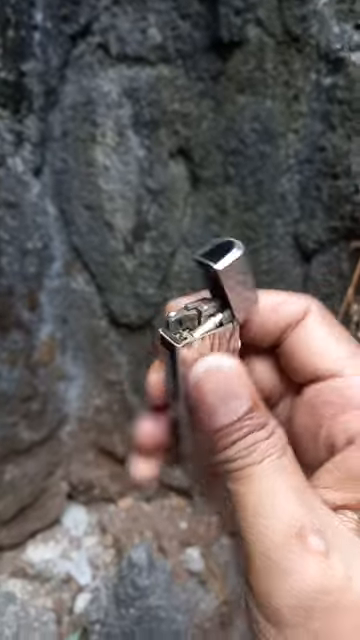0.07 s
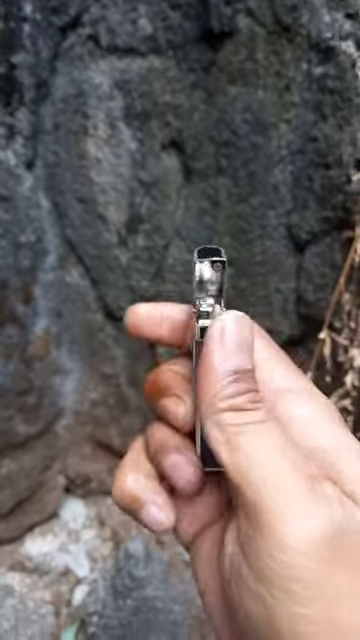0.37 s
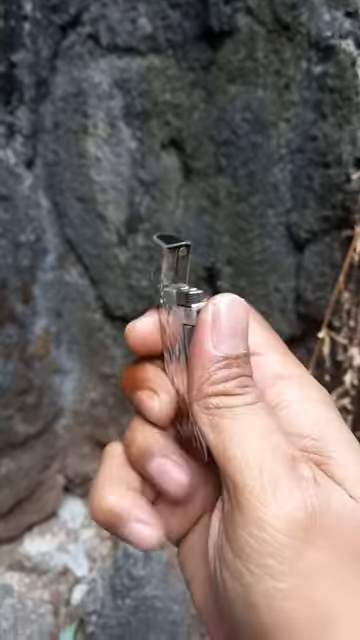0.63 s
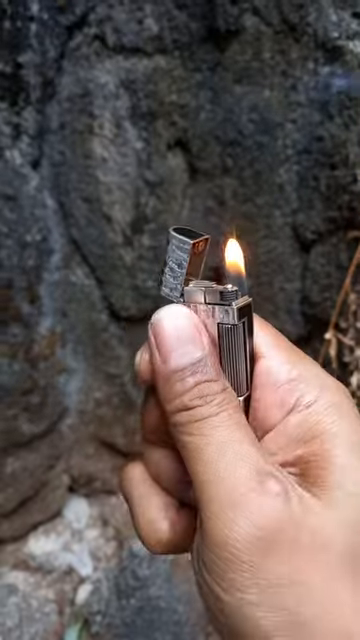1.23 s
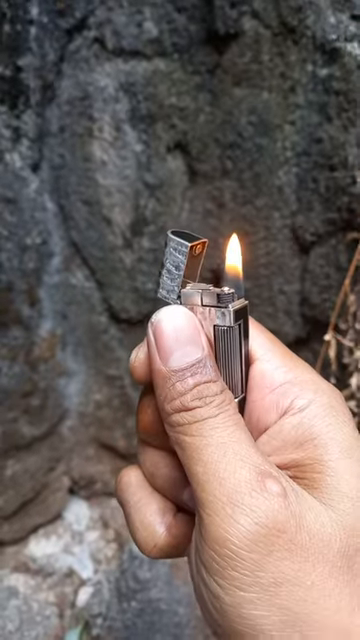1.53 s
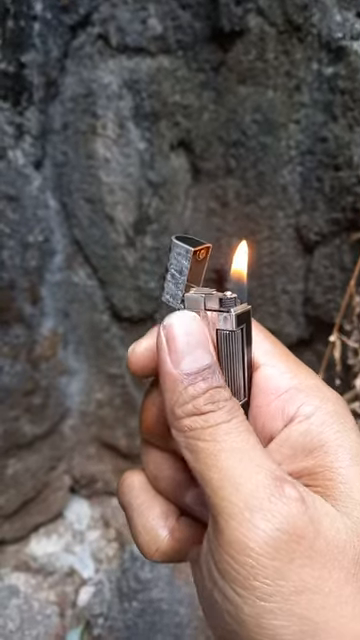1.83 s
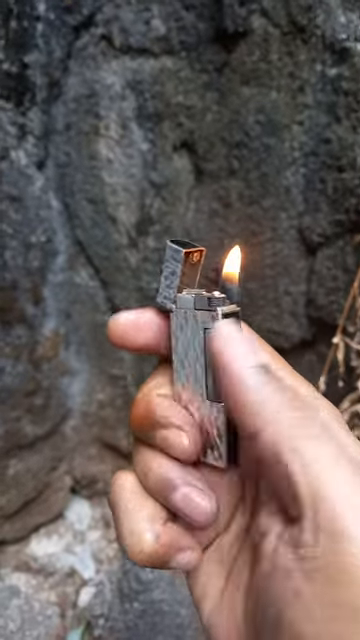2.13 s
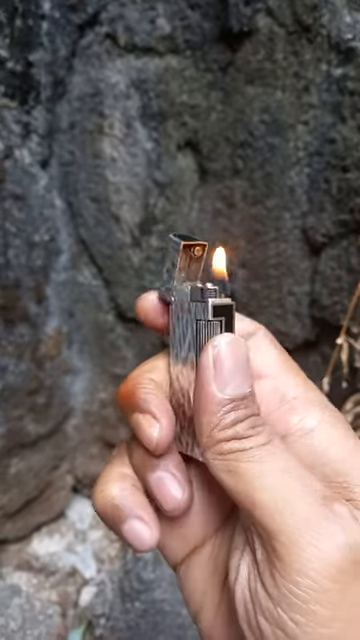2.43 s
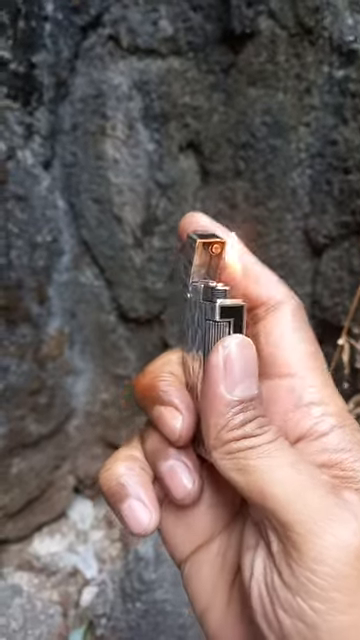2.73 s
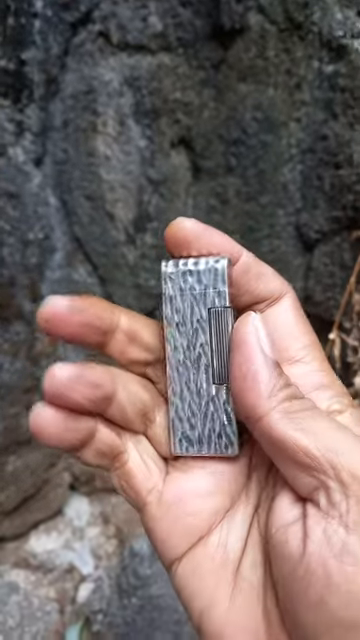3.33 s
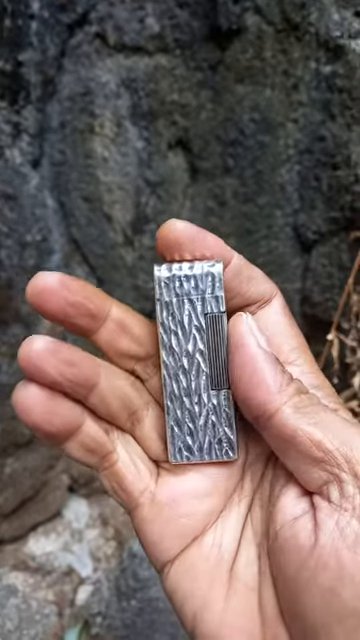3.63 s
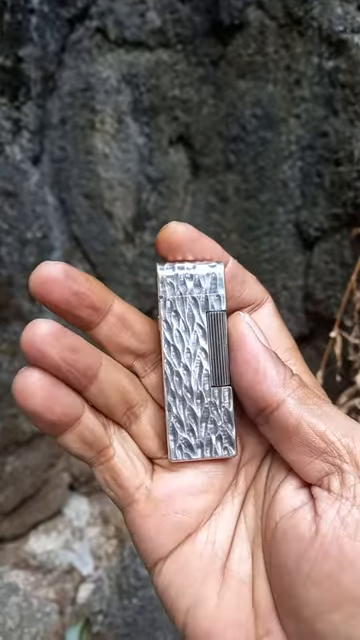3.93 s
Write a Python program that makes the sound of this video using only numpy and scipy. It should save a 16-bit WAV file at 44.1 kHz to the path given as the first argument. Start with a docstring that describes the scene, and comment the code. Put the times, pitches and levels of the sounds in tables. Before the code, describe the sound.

Close up, a lighter's flint wheel scrapes once and the gas burns almost silently until the metal lid clacks shut about two seconds later. Far-off traffic hums outdoors, and a bird whistles two short, quiet phrases.

```python
"""A lighter struck outdoors

Close to the microphone, before a stone wall, a metal lighter's wheel rasps on its flint by friction.
The gas burns with a faint hiss; then the lid's impact rings the case and squeezes out a puff of air.
Small engines drone in harmonics on a road some way off, and a bird whistles two short phrases."""
import sys
import numpy as np
from scipy import signal
from scipy.fft import rfft, irfft
from scipy.io import wavfile

SR = 44100
rng = np.random.default_rng(int(sys.argv[2]) if len(sys.argv) > 2 else 0)


def wav_out(sig):
    """Save sig, one row per channel (or a flat mono array), as 16-bit PCM at SR to the path in sys.argv[1]."""
    wavfile.write(sys.argv[1], SR, np.round(np.clip(np.atleast_2d(sig).T, -1, 1) * 32767).astype(np.int16))


N = 176400
T = np.arange(N) / SR

# The wheel's push on the flint: time_s, level_db
WHEEL_PUSH = [(1.047, -50), (1.056, -35), (1.0595, -24), (1.063, -25), (1.067, -26.5), (1.071, -36),
              (1.080, -41), (1.088, -56)]
# The wheel catches and hits its stop: time_s, level_db
WHEEL_CATCHES = [(1.0588, -8), (1.0627, -9), (1.0690, -5)]
# Spectrum of the rasp: frequency_hz, gain_db
FLINT_COLOUR = [(300, -5), (900, -8), (1300, -11.5), (2300, 0), (3100, -1.5), (4600, -3.5), (7200, -17.5),
                (9000, -1.5), (12000, -8.5), (15500, -12)]
# Its balance: frequency_hz, left_minus_right_db
FLINT_PAN = [(500, -8), (1650, 3), (4500, -6), (15000, 14)]
HANDLING_ECHO_DB = -15.5


def strike(teeth_per_s=3500, thumb_s=1.2):
    """Friction as a train of impulses: teeth tear at the flint, catch and stop; the thumb thuds."""
    push_db, = in_time(WHEEL_PUSH)
    teeth = (rng.random(N) < teeth_per_s / SR) * rng.choice([-1, 1], N)
    teeth = teeth * from_db(rng.uniform(-5.4, 6, N))
    turning = (T > WHEEL_PUSH[0][0]) * (T < WHEEL_PUSH[-1][0])
    force = rms_one(teeth) * from_db(push_db) * turning
    force += sum(from_db(db) * click(s) for s, db in WHEEL_CATCHES)
    rasp = radiate(force, FLINT_COLOUR, FLINT_PAN) + from_db(-29) * case(force)
    thud = from_db(-29) * ring(-click(thumb_s), hz=107, t60_s=0.075)
    return close_by(rasp, HANDLING_ECHO_DB) + thud


# The lid lands and latches: time_s, level_db, left_minus_right_db
LID_HITS = [(2.9520, 9, -1.5), (2.9551, -1.5, 11)]
# Spectrum of the snap: frequency_hz, gain_db
SNAP_COLOUR = [(150, -0.5), (700, -6.5), (1400, -6.5), (2400, -1), (3300, 3.5), (4500, 1.5), (5500, -13),
               (6900, -12), (8200, 0), (11300, 4), (15500, -6.5)]
# Its balance: frequency_hz, left_minus_right_db
SNAP_PAN = [(300, 21.5), (1300, 8), (2400, -7.5), (4400, -8), (8100, -3.5), (15000, 16)]
# The case's crowded modes, merged into a metallic wash: frequency_hz, gain_db
WASH_COLOUR = [(900, -16.5), (2400, 0), (3600, -10), (4600, 4.5), (6700, -6), (8200, -1.5), (11700, 0),
               (15500, -11)]
# Its balance: frequency_hz, left_minus_right_db
WASH_PAN = [(2000, -5.5), (5000, 0.5), (12000, -12)]


def lid(contact_s=0.00046, chatter_s=0.0024, wash_s=0.022):
    """Impact excitation: metal meets metal in a broadband crack and chatter that ring the case."""
    crack = 0
    for s, db, pan_db in LID_HITS:
        contact = click(s) + .5 * burst(s, contact_s)
        chatter = from_db(-7) * burst(s, chatter_s)
        crack += from_db(db) * pan(pan_db) * (contact + chatter)
    landing_s, landing_db, _ = LID_HITS[0]
    crowded_modes = np.array([burst(landing_s, wash_s), burst(landing_s, wash_s)])
    wash = from_db(1) * radiate(crowded_modes, WASH_COLOUR, WASH_PAN)
    snap = radiate(crack, SNAP_COLOUR, SNAP_PAN)
    return close_by(snap + wash, echo_db=-13.5) + case(from_db(landing_db) * click(landing_s))


# The case's clearest modes: frequency_hz, relative_db, t60_s
CASE_MODES = [(2252, -2, .14), (2500, 13, .03), (3380, 17, .024), (4261, -3, .13), (4608, -4, .15),
              (10487, -3, .17), (11680, -1, .14), (13757, -1, .18)]


def case(force):
    """Modal superposition: the metal case answers a force with a sum of damped sines."""
    return from_db(-51) * sum(from_db(db) * ring(force, hz, t60_s) * rng.choice([-1, 1], (2, 1))
                              for hz, db, t60_s in CASE_MODES)


def puff(start_s=2.9525, start_hz=103, end_hz=45, sag_s=0.017, rise_s=0.0014, decay_s=0.0097):
    """Air displacement: the lid's puff hits the left microphone port in a low swing of falling pitch."""
    t = np.maximum(T - start_s, 0)
    cycles = end_hz * t + (start_hz - end_hz) * sag_s * (1 - np.exp(-t / sag_s))
    envelope = (1 - np.exp(-t / rise_s)) * np.exp(-t / decay_s)
    return from_db(-18) * pan(33) * envelope / envelope.max() * np.sin(2 * np.pi * cycles)


# Hiss of the gas flow: time_s, level_db
GAS_FLOW = [(1.06, -72), (1.3, -66.5), (1.58, -61.5), (2.03, -67.5), (2.14, -80), (2.9, -105)]
# Spectrum of the hiss: frequency_hz, gain_db
GAS_COLOUR = [(4000, -13.5), (7200, -2.5), (8800, -2.5), (9800, 3), (12500, -15.5), (16000, -40)]


def flame():
    """Jet noise: escaping gas hisses and dies away."""
    gas_db, = in_time(GAS_FLOW)
    return from_db(gas_db) * (T > GAS_FLOW[0][0]) * noise(GAS_COLOUR)


# Finger strokes on the case: start_s, length_s, level_db
RUBS = [(0.24, 0.59, -78), (.83, 0.34, -75), (2.18, 0.071, -75.5), (2.31, 0.13, -74.5),
        (3.467, 0.18, -77.5), (3.722, 0.3, -79)]
# Spectrum of skin on metal: frequency_hz, gain_db
SKIN_COLOUR = [(7000, -13.5), (8200, 4), (9700, 2), (10500, -5.5), (15000, -23)]


def fingers(grain_db=3, ticks_per_s=9):
    """Sliding friction: fingertips cross the ribbed case in grainy strokes, with faint, sparse ticks."""
    strokes = sum(from_db(db) * swell(s, length_s) for s, length_s, db in RUBS)
    rub = strokes * from_db(grain_db * drift(43)) * noise(SKIN_COLOUR)
    ticks = (rng.random(N) < ticks_per_s / SR) * from_db(-53.5 + rng.uniform(-5.4, 6, N))
    return rub + close_by(radiate(ticks, SKIN_COLOUR, OUTDOOR_PAN), HANDLING_ECHO_DB)


# Three passing engines: time_s, firing_hz, level_db
NEAR_ENGINE = [(0, 45.5, -53.5), (1.05, 53.6, -46), (1.3, 49.5, -37.5), (1.62, 48, -39), (2.02, 45.6, -36),
               (2.11, 43.2, -47), (2.9, 41, -53), (3.2, 41.6, -57)]
FAR_ENGINE = [(0, 37.37, -49), (.8, 37.76, -48), (1.7, 37.13, -43), (2.7, 36.65, -45.5),
              (3.3, 37.33, -68.5)]
LATE_ENGINE = [(0, 40, -77.5), (3.2, 39.62, -54), (3.75, 39.48, -47), (4, 39.52, -48)]
# Their harmonics, from the firing rate upward: relative_db
NEAR_HARMONICS = [0.5, 5, -5, -20.5, -9, -5, -3, -8, -23.5, -8.5, -17.5, -24.5, -22, -13.5]
FAR_HARMONICS = [-21, 0, -6, -2, -13, -3.5, -12.5]
LATE_HARMONICS = [-19, -7.5, 4, 4, -10, -4.5, -4.5, -17]


def engines(jitter_share=0.00575, flutter_db=3):
    """Periodic firing: each slightly uneven engine gives a harmonic series that flutters on its way."""
    drone = np.zeros(N)
    for course, harmonics in ((NEAR_ENGINE, NEAR_HARMONICS), (FAR_ENGINE, FAR_HARMONICS),
                              (LATE_ENGINE, LATE_HARMONICS)):
        firing_hz, level_db = in_time(course)
        phase = 2 * np.pi * np.cumsum(firing_hz * (1 + jitter_share * drift(8))) / SR
        tones = np.zeros(N)
        for order, db in enumerate(harmonics, 1):
            gain = from_db(db + flutter_db * drift(6.1))
            smear_rad = rng.standard_normal()  # echoes blur each firing
            tones += gain * np.cos(order * phase + smear_rad)
        drone += from_db(level_db) * rms_one(tones)
    return drone


# Bass spectrum of a passing engine: frequency_hz, gain_db
ENGINE_BASS = [(28, -35), (42, 1), (90, -1), (140, -23.5), (1000, -66)]


def engine_swell():
    """Band-limited noise: the bass of a passing engine swells briefly."""
    return from_db(-44) * swell(start_s=1.7, length_s=0.4) * noise(ENGINE_BASS)


# Tyre noise: time_s, level_db
TYRES = [(0, -54.5), (.5, -49.5), (1.0, -46.5), (1.55, -40.5), (1.9, -45.5), (2.25, -54), (2.6, -57),
         (3.1, -52.5), (3.7, -51), (4, -51)]
# Its spectrum: frequency_hz, gain_db
TYRE_COLOUR = [(150, -19), (330, 2), (650, 0.5), (830, -3.5), (980, -1.5), (1400, -9), (2150, -9.5),
               (2600, -16.5), (3300, -19.5), (4500, -33.5), (5900, -43.5), (16000, -53)]
# Treble that grows as traffic nears: frequency_hz, gain_db
NEAR_COLOUR = [(1500, -24.5), (2600, -4.5), (4200, -4), (5900, -14.5), (16000, -30)]
# Road rumble: time_s, level_db
RUMBLE = [(0, -47.5), (1.0, -47), (1.7, -42.5), (2.35, -47), (2.9, -46), (3.3, -51), (3.75, -47)]
# Its spectrum: frequency_hz, gain_db
RUMBLE_COLOUR = [(28, -33), (45, -2.5), (80, 1.5), (135, 2), (200, -4.5), (290, -3.5), (430, -7),
                 (600, -24.5), (1500, -55)]


def traffic(treble_db_per_db=1.66):
    """Rolling noise: tyres grow louder and brighter as they near, under the engines and the rumble."""
    tyre_db, = in_time(TYRES)
    rumble_db, = in_time(RUMBLE)
    treble_db = -56 + treble_db_per_db * (tyre_db - tyre_db.max())
    tyres = from_db(tyre_db) * noise(TYRE_COLOUR) + from_db(treble_db) * noise(NEAR_COLOUR)
    return tyres + engines() + engine_swell() + from_db(rumble_db) * noise(RUMBLE_COLOUR)


# Whistled notes: start_s, length_s, start_hz, end_hz, level_db
BIRD_NOTES = [(0, 0.031, 3355, 2890, -50), (0.047, 0.015, 3143, 2980, -51.5),
              (0.061, 0.019, 2960, 2610, -47.5), (.096, 0.016, 2830, 2354, -51),
              (.22, 0.024, 3600, 3120, -55), (0.285, 0.037, 2600, 3100, -54.5),
              (0.315, 0.0287, 3470, 3010, -53), (0.37, 0.035, 3350, 3370, -60.5),
              (2.518, 0.06, 2880, 2950, -65), (2.616, 0.017, 2850, 2520, -59),
              (2.724, 0.032, 3516, 3270, -68.5), (2.791, 0.05, 2500, 3150, -60),
              (2.817, 0.029, 3420, 3380, -58), (3.063, 0.093, 3200, 2940, -55),
              (3.166, 0.014, 2850, 2554, -49), (3.28, 0.03, 3683, 3580, -59.5),
              (3.338, 0.034, 2620, 2865, -60.5), (3.37, 0.05, 3300, 3380, -64)]


def bird(warble_share=.03, flutter_db=3):
    """Frequency modulation: short whistles glide and warble, blurred by reverberation from afar."""
    song = np.zeros(N)
    warble = 1 + warble_share * drift(120)
    for start_s, length_s, start_hz, end_hz, db in BIRD_NOTES:
        sounding = (T >= start_s) & (T < start_s + length_s)
        progress = (T[sounding] - start_s) / length_s
        pitch_hz = (start_hz + (end_hz - start_hz) * progress) * warble[sounding]
        envelope = from_db(db) * np.sqrt(2 * np.abs(np.sin(np.pi * progress)))
        song[sounding] += envelope * np.sin(2 * np.pi * np.cumsum(pitch_hz) / SR)
    song *= from_db(flutter_db * (drift(90) - .5))
    return pan(-5.5) * (from_db(-0.5) * song + from_db(1) * echoes(song, t60_s=0.54))


# Spectrum of the background hiss: frequency_hz, gain_db
AIR_COLOUR = [(3000, -1.5), (7000, -5), (8300, 4.5), (13000, -8.5)]


def air():
    """Noise floor: a faint, steady, high hiss."""
    return from_db(-78) * noise(AIR_COLOUR)


def close_by(x, echo_db, lag_s=.00015, t60_s=0.38):
    """Path difference: sound reaches the left port first; the walls answer evenly on both sides."""
    direct = np.array([x[0], np.roll(x[1], int(lag_s * SR))])
    return direct + from_db(echo_db) * (echoes(x[0], t60_s) + echoes(x[1], t60_s)) / np.sqrt(2)


def echoes(x, t60_s, early_t60_s=0.17, treble_hz=9000, treble_t60_share=.66):
    """Reverberation from stone: dense early reflections and a longer tail whose treble dies first."""
    t = T[:SR // 2]
    white = rng.standard_normal((2, len(t)))
    dull = signal.sosfiltfilt(signal.butter(2, treble_hz, fs=SR, output="sos"), white)
    fade = lambda seconds: from_db(-60 * t / seconds)
    tail = dull * fade(t60_s) + (white - dull) * fade(t60_s * treble_t60_share)
    early = white * from_db(-5.5) * fade(early_t60_s)
    response = rms_one(tail + early) / np.sqrt(len(t))
    return signal.fftconvolve(np.broadcast_to(x, (2, N)), response, axes=1)[:, :N]


# Likeness of left and right outdoors: frequency_hz, correlation
COHERENCE = [(60, 0.54), (250, 0.93), (500, 0.37), (1000, 0.062)]
# Balance outdoors: frequency_hz, left_minus_right_db
OUTDOOR_PAN = [(60, -3.5), (300, -6), (640, -0.5), (1500, -6), (3100, -5), (7000, -3.5), (14000, 4)]


def noise(spectrum):
    """Partial coherence: coloured stereo noise of unit power, alike in the bass and leaning right."""
    hz = np.fft.rfftfreq(N, 1 / SR)
    mid, side = rfft(rng.standard_normal((2, N))) * from_db(at_hz(spectrum, hz))
    alike = np.clip(at_hz(COHERENCE, hz), -1, 1)
    signs = np.array([[1], [-1]])
    stereo = np.sqrt(1 + alike) * mid + np.sqrt(1 - alike) * side * signs
    return rms_one(irfft(stereo * from_db(signs * at_hz(OUTDOOR_PAN, hz) / 2), N))


def radiate(x, spectrum, balance, size=2048):
    """Minimum-phase filtering: causal stereo colouring that keeps a click's energy."""
    hz = np.fft.rfftfreq(size, 1 / SR)
    gain_db = at_hz(spectrum, hz) + at_hz(balance, hz) * np.array([[.5], [-.5]])
    cepstrum = irfft(np.log(from_db(gain_db)))
    cepstrum[:, 1:size // 2] *= 2
    cepstrum[:, size // 2 + 1:] = 0
    response = rms_one(irfft(np.exp(rfft(cepstrum)))) / np.sqrt(size)
    return signal.fftconvolve(np.broadcast_to(x, (2, N)), response, axes=1)[:, :N]


def ring(x, hz, t60_s):
    """Damped resonance: a unit click starts a dying sine of height 1."""
    radius, angle = from_db(-60 / (t60_s * SR)), 2 * np.pi * hz / SR
    return signal.lfilter([0, np.sin(angle)], [1, -2 * radius * np.cos(angle), radius ** 2], x + 1e-18)


def click(time_s):
    """A unit impulse."""
    return 1. * (np.arange(N) == int(time_s * SR))


def burst(start_s, decay_s):
    """Exponential decay: a dying run of tiny contacts with unit energy."""
    contacts = rng.choice([-1, 1], N) * (T > start_s)
    return rms_one(contacts * np.exp(-np.abs(T - start_s) / decay_s)) / np.sqrt(N)


def swell(start_s, length_s):
    """A rounded envelope, 1 at its top."""
    return np.sqrt(np.abs(np.sin(np.pi * np.clip((T - start_s) / length_s, 0, 1))))


def drift(rate_hz):
    """Random modulation: low-passed noise of unit power."""
    pole = np.exp(-80 * np.pi * rate_hz / SR)
    white = rng.standard_normal(N // 40 + 2002)  # one value per 40 samples
    slow = signal.lfilter([1], [1, -2 * pole, pole * pole], white)[2000:]
    return np.interp(np.arange(N) / 40, np.arange(len(slow)), rms_one(slow))


def pan(left_minus_right_db):
    """Constant-power gains for a level difference."""
    return rms_one(from_db(np.array([[left_minus_right_db], [-left_minus_right_db]]) / 2))


def in_time(rows):
    """Interpolate each column of a curve at every sample."""
    time_s, *columns = np.transpose(rows)
    return [np.interp(T, time_s, column) for column in columns]


def at_hz(points, hz):
    """Interpolate a spectrum on a log-frequency axis."""
    frequency_hz, values = np.transpose(points)
    return np.interp(np.log(np.maximum(hz, 1)), np.log(frequency_hz), values)


def from_db(db):
    """Decibels to amplitude ratio."""
    return 10 ** (np.asarray(db) / 20)


def rms_one(x):
    """Scale to unit power."""
    return x / np.sqrt(np.mean(x ** 2) + 1e-20)


def scene():
    """Superposition: the lighter in front; road, bird and a faint hiss behind."""
    hiss = air()
    return strike() + flame() + lid() + puff() + fingers() + traffic() + bird() + hiss


def record(dry):
    """Saturation and band limiting: the hardest peak is rounded and the top is cut steeply."""
    ceiling, cutoff_hz = .8, 15950
    low_pass = signal.ellip(10, .2, 80, cutoff_hz, fs=SR, output="sos")
    return signal.sosfilt(low_pass, ceiling * np.tanh(dry / ceiling))


dry = scene()
out = record(dry)
wav_out(out)
```